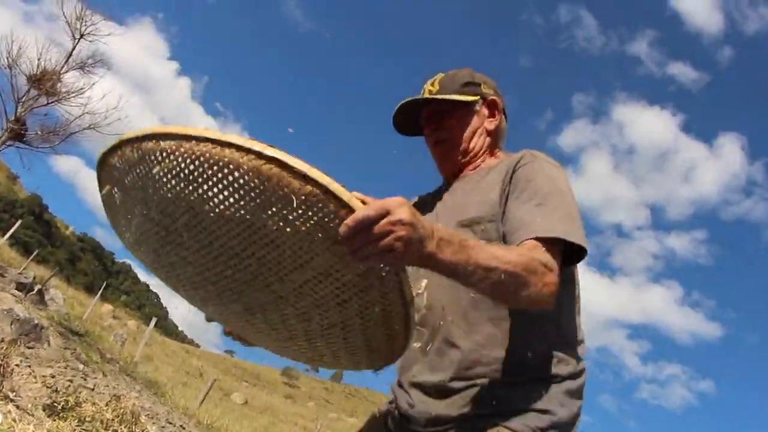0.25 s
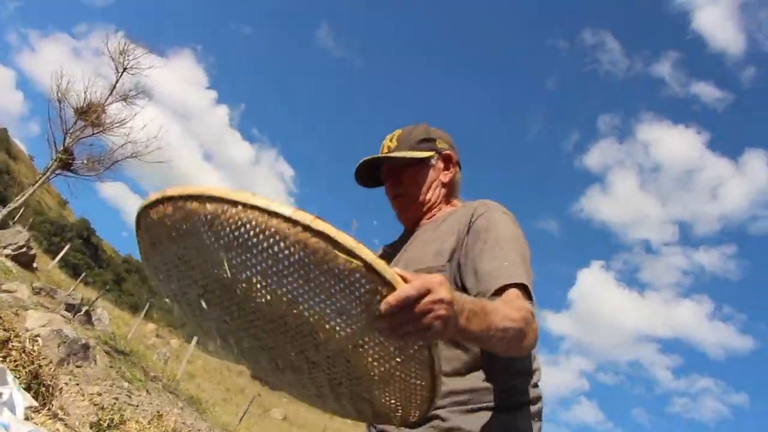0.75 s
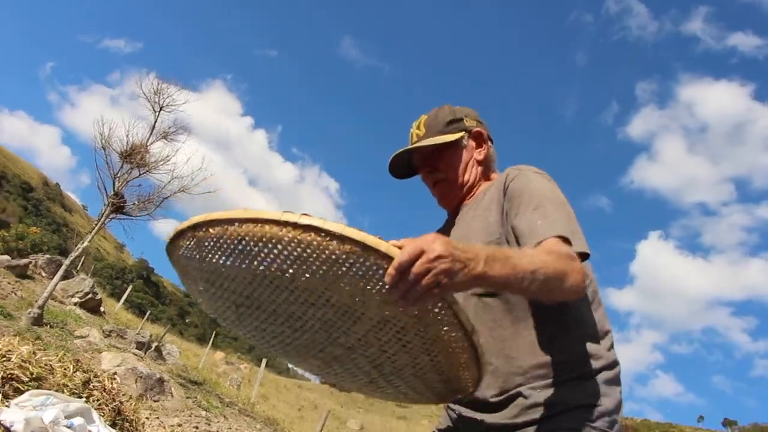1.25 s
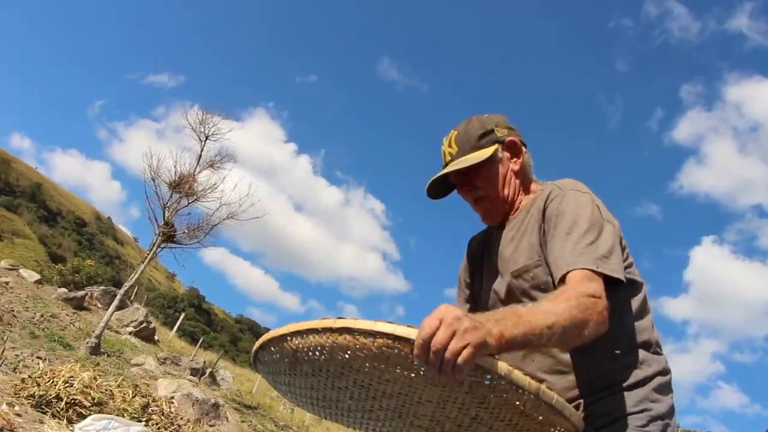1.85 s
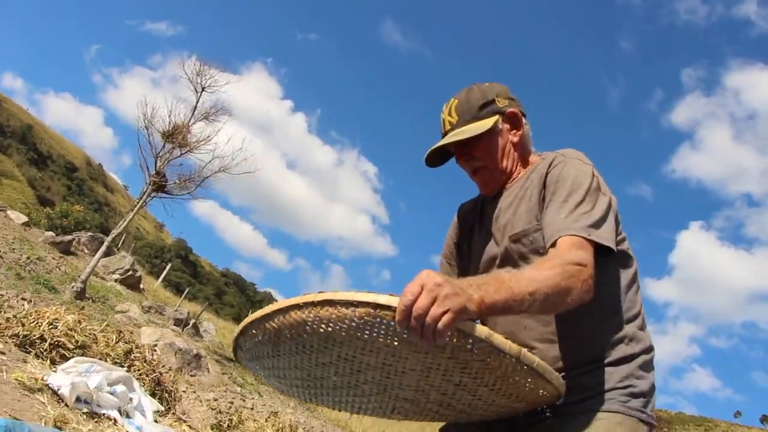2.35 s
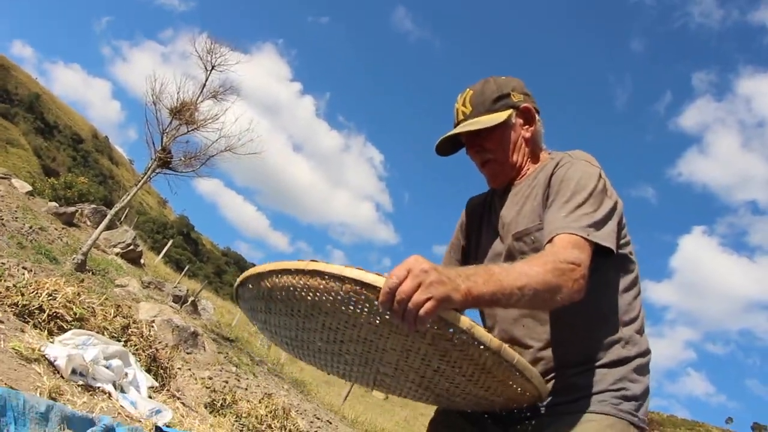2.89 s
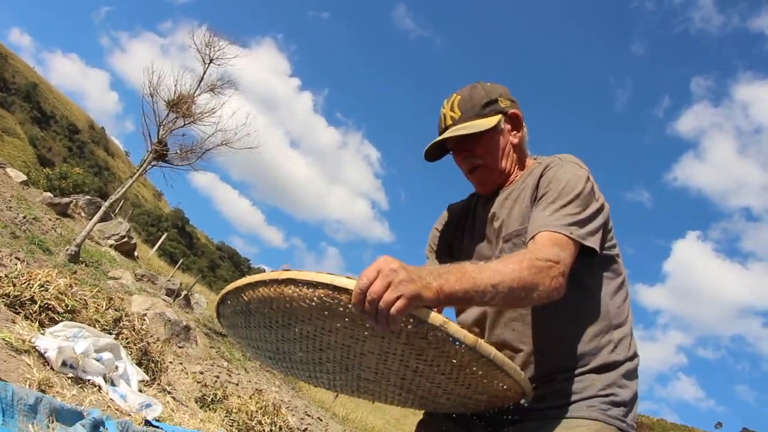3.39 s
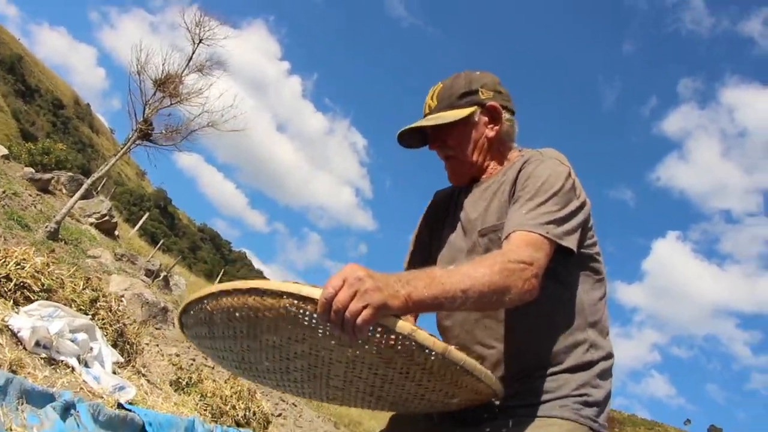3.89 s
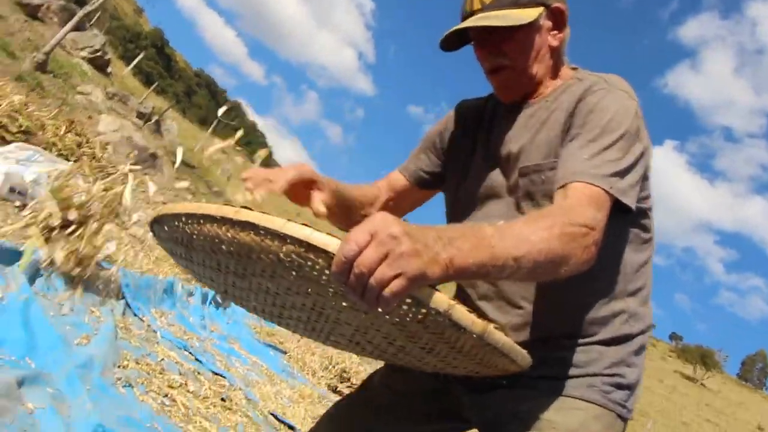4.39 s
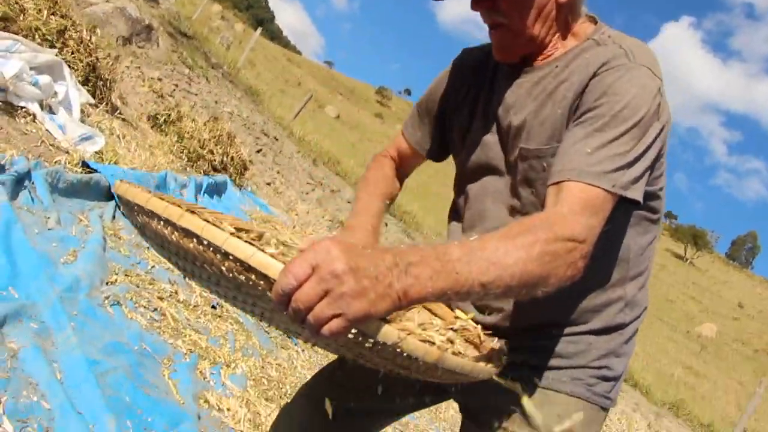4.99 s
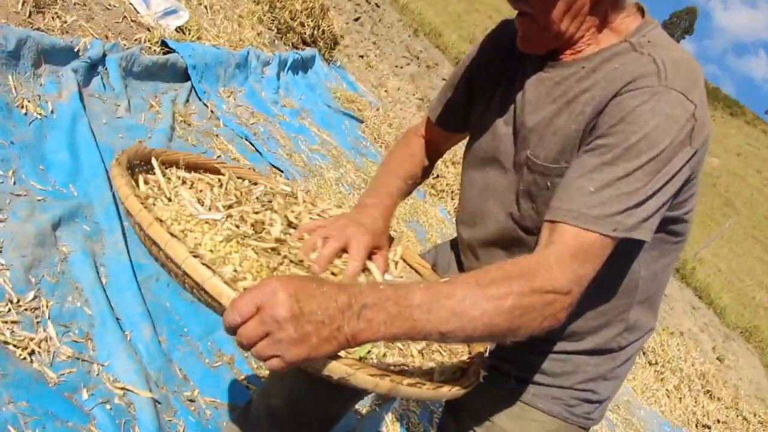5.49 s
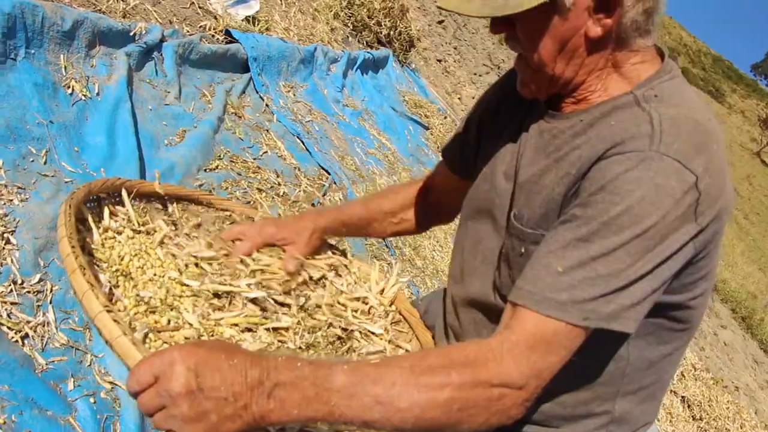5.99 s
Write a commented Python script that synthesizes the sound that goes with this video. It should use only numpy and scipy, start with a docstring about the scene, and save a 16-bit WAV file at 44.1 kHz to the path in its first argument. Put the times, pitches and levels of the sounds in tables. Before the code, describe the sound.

Brisk, hissing shakes of dry husks in a sieve give way to softer hand raking, scattered snaps and two handfuls of pods thrown on a tarpaulin.

```python
"""Outdoors, about a metre from the microphone: dry beans and broken pods are winnowed in a woven cane sieve.
The load is shaken to and fro, levelled, then raked by hand; two handfuls of pods are thrown on a tarpaulin.
Random impacts, filtered by weave or sheet resonances, make the patter of beans, rattle of pods and crackle
of chaff; short damped cycles make single knocks, snaps, bumps, bounces and many small dry cracks.
Filtered noise makes the wind on the two microphone ports and a faint, steady hush."""
import sys
import numpy as np
from scipy import signal
from scipy.fft import rfft, irfft
from scipy.io import wavfile

SR = 44100
rng = np.random.default_rng(int(sys.argv[2]) if len(sys.argv) > 2 else 0)


def generate_wav(sig):
    """Save sig (samples, or channels by samples) to the path in sys.argv[1] as 16-bit PCM at SR."""
    pcm = np.round(np.clip(np.atleast_2d(sig).T, -1, 1) * 32767).astype(np.int16)
    wavfile.write(sys.argv[1], SR, pcm)


N = 275625
TIME = np.arange(N) / SR
STEPS = TIME[::100]  # coarse time grid for slow level curves
FREQ = np.fft.rfftfreq(N, 1 / SR)
TOP_HZ = 16050
PORT_LAG_S = 5e-5  # the sieve is a little to the left
RELEASE_SHAPE = 1.6  # 1 = exponential fall, 2 = bell

# resonances of the loaded weave: f/Hz, width/Hz, level/dB
WEAVE_MODES = [(423, 120, -3), (590, 230, 2.5), (695, 260, -9), (880, 230, -2), (1400, 200, -2),
               (1810, 160, -3), (2340, 270, 2.5), (3540, 250, 11)]


def motion():
    """Stirring of beans, pods, chaff and fines in dB: shakes, rolls and hand strokes add up in power."""
    # all levels are before layer gain
    # shakes to and fro, about six a second: peak t/s, chaff level/dB, beans re chaff/dB
    shake_rows = [(0.05, -23, -17.5), (0.218, -21.5, -21), (0.405, -21, -17), (0.582, -22.5, -20),
                  (0.762, -23.5, -19), (0.917, -21.5, -19.5), (1.075, -23.0, -22), (1.226, -22, -22)]
    shake_rise_s, shake_fall_s = 0.056, 0.082
    shake_pods_db, shake_fines_db = -2, -4.5  # re chaff
    # load rolling back as the sieve is levelled: peak t/s, chaff level/dB, beans re chaff/dB
    roll_rows = [(1.366, -32, -22), (1.505, -36, 4), (1.608, -33.5, -16.5), (1.755, -35.5, -10)]
    roll_rise_s, roll_fall_s = 0.057, 0.045
    roll_pods_db, roll_fines_db = 2, -6.6  # re chaff
    # hand strokes, each with its own mix of the load:
    # peak t/s, chaff level/dB, rise/s, fall/s, beans re chaff/dB, pods re chaff/dB, fines re chaff/dB
    stroke_rows = [(2.197, -31.5, 0.06, 0.13, -28.5, -7.5, -10),
                   (2.392, -31.5, 0.075, 0.018, -23, -1.5, -13),
                   (2.691, -33.5, 0.156, 0.14, -36.5, -7.5, -17), (2.847, -41, 0.046, 0.069, -10, -1, -13),
                   (3.175, -36, 0.107, 0.075, -18.5, -8.5, -7.5),
                   (3.599, -29.5, 0.074, 0.221, -15.5, -3.5, -8), (3.9, -32.5, 0.11, 0.097, -16, -15, -16),
                   (4.419, -38.0, 0.15, 0.12, -14, -9.5, -2), (4.759, -28.5, 0.024, 0.11, -10.5, -8, -6.5),
                   (4.899, -27.5, 0.095, 0.18, -14, -6, -7.5), (5.352, -39, 0.06, 0.013, -3.5, -2.5, -2),
                   (5.499, -27, 0.048, 0.12, -16.5, -8.0, -3.5),
                   (5.851, -33.5, 0.073, 0.12, -9.0, -9, -4.5),
                   (6.088, -26.0, 0.044, 0.15, -22.5, -7.5, -4)]
    # floor of the never quite still load: beans/dB, pods/dB, chaff/dB, fines/dB
    restless_db = (-59, -51, -52, -61)
    clumps_per_s, clump_db = 40, 0.7  # the load moves in clumps, so its level flutters

    power = undb(restless_db) ** 2
    for peak_s, db, beans_db in shake_rows:
        power = power + stir(peak_s, db, shake_rise_s, shake_fall_s, beans_db, shake_pods_db, shake_fines_db)
    for peak_s, db, beans_db in roll_rows:
        power = power + stir(peak_s, db, roll_rise_s, roll_fall_s, beans_db, roll_pods_db, roll_fines_db)
    for row in stroke_rows:
        power = power + stir(*row)
    level_db = curves(np.column_stack([STEPS, 10 * np.log10(power)]))
    return level_db + clump_db * waver(clumps_per_s)


def stir(peak_s, db, rise_s, fall_s, beans_db, pods_db, fines_db):
    """One movement sets beans, pods, chaff and fines going, each in its own proportion of power."""
    shares = undb([beans_db, pods_db, 0, fines_db]) ** 2
    return np.outer(swell(peak_s, db, rise_s, fall_s), shares)


def beans(db):
    """Hard beans patter on the weave and ring its resonances."""
    # colour of the patter: f/Hz, level/dB
    bean_colour = [(80, -53), (170, -11.5), (300, -2.5), (450, 0), (800, 1), (1200, -19.5), (2500, -20),
                   (4000, -49), (7000, -55)]
    body = colour(bean_colour) * (undb(1.0) + modes(WEAVE_MODES))
    patter = contacts(db, per_s=1100, crowding=0.6, uneven_db=5.5, scatter_db=5)
    return unit(patter * body, 250, 750) * undb(db)


def pods(db):
    """Tumbling pods rattle broadly; sliding as a heap over the cane they ring with a hollow note."""
    # pod motion: t/s, share sliding in one heap instead of tumbling (0-1)
    sliding_rows = [(0, 0.05), (2.0, 0), (2.2, 0.89), (2.6, .86), (3.3, 0.4), (3.8, 0.7), (4.7, 0.12),
                    (6.25, 0.26)]
    # colour of the tumbling: f/Hz, level/dB
    tumble_colour = [(300, -39.5), (600, -19.5), (850, -4.5), (1150, -1), (1550, -3.5), (1920, -1),
                     (2250, -3), (2800, -2.5), (4000, -8.5), (8000, -38.5)]
    # colour of the sliding: f/Hz, level/dB
    slide_colour = [(400, -35.5), (900, -13), (1130, 3), (1360, 1.5), (1480, 7), (1700, 2), (2200, -1.5),
                    (3000, -0.5), (4500, -28), (8000, -32)]
    share = np.clip(curves(sliding_rows)[0], 0, 1)

    tumble = contacts(db, per_s=2400, crowding=0.9, uneven_db=1.5, scatter_db=-9.5)
    tumble = tumble * colour(tumble_colour)
    tumble = tumble * (1 + undb(-18.5) * modes(WEAVE_MODES))  # a little of the weave rings along
    slide = contacts(db, per_s=2300, crowding=0.7, uneven_db=2.0, scatter_db=-10.0)
    slide = slide * colour(slide_colour)

    # crossfade at constant power
    mix = np.sqrt(1 - share) * unit(tumble, 1000, 2800)
    mix = mix + np.sqrt(share) * unit(slide, 1000, 2800)
    return mix * undb(db)


def chaff(db, fines_db):
    """Thin flakes crackle; the finest of them hiss at the very top."""
    # colour of the flakes: f/Hz, level/dB
    chaff_colour = [(1200, -52.5), (2400, -9), (3500, -2), (5200, 1.5), (6500, 1.5), (9500, -1),
                    (11500, -12.5), (14000, -33)]
    # colour of the fines: f/Hz, level/dB
    fines_colour = [(7000, -35), (9500, -3.5), (11300, 1.5), (13000, -1.5), (15000, -4), (16000, -22)]
    flakes = contacts(db, per_s=7000, crowding=0.54, uneven_db=4.5, scatter_db=-2.0)
    crackle = unit(flakes * colour(chaff_colour), 4000, 10000) * undb(db)
    fines = contacts(fines_db, per_s=23000, crowding=0.45, uneven_db=8.5, scatter_db=-4.5)
    hiss = unit(fines * colour(fines_colour), 11000, 15500) * undb(fines_db)
    return crackle + undb(-1.5) * hiss


def dry_cracks(chaff_db, count=260, mean_db=-25, follow=0.6, uneven_db=2.0, centre_hz=4400, octaves=0.75):
    """Many small dry cracks, about forty a second at random times, standing out most when the load lies quiet."""
    when, size, pitch = rng.random((count, 3)).T
    index = (when * N).astype(int)
    # cracks follow the chaff by less than dB for dB
    db = mean_db + follow * (chaff_db[index] - chaff_db.mean())
    db = db - uneven_db * np.log(np.maximum(size, 1 / 20))
    hz = np.clip(centre_hz * 2 ** (2 * octaves * (2 * pitch - 1)), 1000, 13000)
    rows = np.transpose([index / SR, db, hz])
    return blows(rows, cycles=0.77, rattle_db=-4, rattle_s=0.0041, rattle_width=0.37, bass_hz=900)


def knocks():
    """Single beans and pods knock, and the sieve knocks once as it is set down at about 1.57 s: heavily damped
    cycles with a faint rattle."""
    # knocks: t/s, level/dB before layer gain, f/Hz
    knock_rows = [(0.5611, -11.5, 1220), (0.5734, -13.5, 1360), (1.4606, -17, 1540), (1.51, -18.5, 1030),
                  (1.5743, -10, 800), (1.8446, -23, 2000), (1.9084, -23, 2200), (1.9752, -23.5, 1450),
                  (2.6, -28, 1330), (3.4182, -18, 980), (3.4341, -10.5, 1610), (3.5488, -17, 1300),
                  (4.6075, -16.5, 830), (4.626, -13.5, 1430), (4.6376, -10, 1080), (4.6946, -15.5, 1270),
                  (4.9425, -20.5, 1360), (5.3067, -16.5, 1090), (5.357, -23, 2400), (5.3714, -21.5, 1510),
                  (5.4657, -18.5, 1400), (5.551, -9, 1960), (5.5812, -23, 1030), (5.7077, -22, 1300),
                  (5.8345, -20.5, 1740), (5.9624, -22, 2890), (6.2184, -35, 1420)]
    return blows(knock_rows, cycles=0.34, rattle_db=-17, rattle_s=0.0061, rattle_width=0.76, bass_hz=343)


def snaps():
    """Dry pods snap: short, high damped cycles without bass."""
    # snaps: t/s, level/dB before layer gain, f/Hz
    snap_rows = [(0.4688, -8, 4200), (0.4851, -23, 4850), (1.8823, -22, 4700), (2.0461, -16.5, 7040),
                 (2.5735, -21, 8240), (2.9925, -22.5, 4940), (4.3138, -12, 4170), (4.368, -18, 8200),
                 (4.7501, -15.5, 5840), (5.3413, -18.5, 9600), (5.3709, -20, 9820), (5.551, -17, 5230),
                 (5.8182, -12, 8400)]
    return blows(snap_rows, cycles=0.55, rattle_db=-10.5, rattle_s=0.0023, rattle_width=0.35, bass_hz=1400)


def bumps():
    """The whole sieve bumps softly: low damped cycles with a strong rattle."""
    # bumps: t/s, level/dB before layer gain, f/Hz
    bump_rows = [(.507, -17.5, 162), (.566, -17, 404), (1.476, -22.5, 130), (1.512, -27.5, 230),
                 (1.574, -28, 382), (2.216, -24.5, 696), (5.787, -19.5, 326), (5.822, -19, 353),
                 (6.214, -20.5, 590)]
    return blows(bump_rows, cycles=0.83, rattle_db=-1.5, rattle_s=0.0097, rattle_width=0.79, bass_hz=108)


def thrown_pods():
    """Handfuls of empty pods land on the tarpaulin, then single pods bounce."""
    # handfuls: t/s, landing gain/dB, shower length/s, left re right/dB
    handful_rows = [(3.422, -19, 0.11, 3), (4.62, -17.5, 0.081, 6)]
    return sum(handful(*row) + place(bounces(row[0]), db=-4, left_db=5) for row in handful_rows)


def handful(start_s, db, length_s, left_db):
    """Pods hit the tarpaulin almost at once and then thin out; the sheet thuds, the husks crackle."""
    # resonances of the struck sheet: f/Hz, width/Hz, level/dB
    tarp_modes = [(435, 76, -6.5), (555, 100, 0.5), (764, 90, -16), (883, 91, 3.5), (1150, 100, -5),
                  (1470, 150, -4), (1790, 200, -7)]
    # colour of the sheet: f/Hz, level/dB
    tarp_colour = [(80, -48), (170, -11), (310, -9), (420, 0.5), (1400, 1.5), (2500, -8.5), (5000, -29)]
    # colour of the husks: f/Hz, level/dB
    husk_colour = [(900, -21.5), (2000, -4.5), (3500, -3.5), (6000, -3), (10000, -4), (12000, -6.5),
                   (16000, -16)]
    age = np.maximum(TIME - start_s, 0)
    shower = (1 - np.exp(-age / 0.012)) * np.exp(-(age / length_s) ** 1.66)
    # impacts grow sparser with age
    thinning_db = np.where(TIME < start_s, 0, 14 * np.exp(-age / length_s))

    sheet = colour(tarp_colour) * (undb(-1) + modes(tarp_modes))
    thuds = contacts(thinning_db, per_s=480, crowding=1.0, uneven_db=2.5, scatter_db=-7.5) * sheet
    husks = contacts(thinning_db, per_s=910, crowding=0.9, uneven_db=1.5, scatter_db=-4.5)
    husks = husks * colour(husk_colour)
    landing = undb(-2.5) * unit(thuds, 0, TOP_HZ) + unit(husks, 0, TOP_HZ)
    return place(shower * landing, db, left_db)


def bounces(start_s, count=12, delay_s=0.07, spread_s=0.24, first_db=-19, fade_db_per_s=30, centre_hz=750):
    """After a handful has landed, single pods bounce on the sheet, ever more softly."""
    when, pitch = rng.random((count, 2)).T
    age = delay_s + spread_s * when
    rows = np.transpose([start_s + age, first_db - fade_db_per_s * age, centre_hz * 2 ** (pitch - 0.5)])
    return blows(rows, cycles=0.67, rattle_db=-9, rattle_s=0.0056, rattle_width=0.46, bass_hz=261)


def wind():
    """Eddies rumble on each port separately; their shared strength swells with gusts and wavers."""
    # gusts and short buffets: peak t/s, level/dB before layer gain, half length/s
    gust_rows = [(.5, -43.5, .3), (1.63, -37.5, 0.23), (1.968, -30, 0.074), (2.29, -38.5, 0.24),
                 (2.785, -43, 0.33), (3.98, -38, 0.047), (4.35, -43, 0.57), (4.61, -32.5, 0.019),
                 (4.772, -28.5, 0.019), (4.925, -32.5, 0.074), (5.15, -36, 0.072), (5.427, -31.5, 0.13),
                 (5.74, -30.5, 0.099), (5.963, -28.5, .035), (6.157, -31, .1)]
    # colour of the eddies: f/Hz, level/dB
    wind_colour = [(10, -34), (22, 6.5), (35, -2.5), (60, -4), (85, -16), (125, -23.5), (200, -34.5),
                   (400, -38), (1000, -40)]
    calm_db = -52  # before layer gain
    buffets_per_s, buffet_db = 9.2, 1.9
    power = undb(calm_db) ** 2 + sum(swell(s, db, half_s, half_s) for s, db, half_s in gust_rows)
    strength = np.sqrt(np.interp(TIME, STEPS, power)) * undb(buffet_db * waver(buffets_per_s))
    eddies = rfft(rng.standard_normal((2, N))) * colour(wind_colour)
    return unit(eddies, 20, 120) * strength


def air():
    """Faint, steady hush of the open air: coloured noise, independent at each port."""
    # colour of the hush: f/Hz, level/dB
    air_colour = [(100, -6.5), (220, 4), (400, -4), (550, 5), (700, 1), (1400, 2), (1720, -20), (1880, 15),
                  (2060, -25), (3300, -35), (3700, 0), (4100, -2), (15000, -32)]
    air_db = -53.5
    hush = rfft(rng.standard_normal((2, N))) * colour(air_colour)
    return unit(hush, 0, TOP_HZ) * undb(air_db)


def contacts(db, per_s, crowding, uneven_db, scatter_db):
    """Stereo spectra of tiny random impacts of uneven size, more frequent when the level is higher."""
    chance = np.clip(per_s * undb(crowding * (db - db.mean())) / SR, 1e-4, 1)  # per sample
    spread = np.clip(rng.standard_normal((3, N)), -np.pi, np.pi)
    sizes = rng.choice([-1, 1], (3, N)) * undb(uneven_db * spread)
    # dividing by sqrt(chance) keeps the mean power independent of the rate
    hits = (rng.random((3, N)) < chance) * sizes / np.sqrt(chance)
    return ports(hits[0], undb(scatter_db) * hits[1:])


def blows(rows, cycles, rattle_db, rattle_s, rattle_width, bass_hz):
    """Each blow is a few damped cycles; what lies around it rattles briefly at about the same pitch."""
    out = np.zeros((3, N + SR))  # direct, two scattered parts
    t = np.arange(SR // 20) / SR
    for s, db, hz in rows:
        ring = np.sin(2 * np.pi * hz * t) * np.exp(-hz * t / cycles)
        edges_hz = [hz / (1 + rattle_width), min(hz * (1 + rattle_width), TOP_HZ)]
        band = signal.butter(1, edges_hz, "band", fs=SR)
        rattle = signal.lfilter(*band, rng.standard_normal((3, len(t))))
        rattle = signal.lfilter(*band, rattle)
        blow = undb(rattle_db) * rattle / rattle.std() * np.exp(-t / rattle_s)
        blow[0] += ring / ring.max()
        start = int(s * SR)
        out[:, start:start + len(t)] += undb(db) * blow
    stereo = irfft(ports(out[0, :N], out[1:, :N] / 2), N)
    # small, open things radiate little bass
    bass_cut = signal.butter(2, bass_hz, "high", fs=SR)
    return signal.lfilter(*bass_cut, stereo)


def swell(peak_s, db, rise_s, fall_s):
    """Power of one push at each time step: it builds up in a bell curve and then dies away."""
    age = STEPS - peak_s
    rise = (age / rise_s) ** 2
    fall = np.abs(age / fall_s) ** RELEASE_SHAPE
    return undb(db) ** 2 * np.exp(-np.where(age < 0, rise, fall))


def waver(per_s):
    """Random values at a given rate, joined by straight lines."""
    return np.interp(TIME * per_s, np.arange(len(STEPS)), rng.standard_normal(len(STEPS)))


def modes(rows):
    """Frequency response of damped modes, given as (f/Hz, width/Hz, level/dB)."""
    response = 0
    for hz, width_hz, db in rows:
        damping = 1j * FREQ * width_hz
        response = response + undb(db) * damping / (hz ** 2 - FREQ ** 2 + damping)
    return response


def colour(points):
    """Causal minimum-phase frequency response through (f/Hz, level/dB) points, via the cepstrum."""
    hz, db = np.transpose(points)
    gain = undb(np.interp(np.log(FREQ + 1), np.log(hz), db))
    cepstrum = irfft(np.log(gain), N)
    cepstrum[1:] *= 2 * (np.arange(1, N) < N / 2)  # fold onto positive time
    return np.exp(rfft(cepstrum))


def ports(direct, scatter, spread_hz=4500, likeness=0.82):
    """Direct sound reaches the right port later; scattered sound grows less alike with frequency."""
    alike = min(likeness, 1) * np.sinc(FREQ / spread_hz)
    mid, side = rfft(scatter) * np.sqrt([(1 + alike) / 2, (1 - alike) / 2])
    front = rfft(direct)
    lag = np.exp(-2j * np.pi * FREQ * PORT_LAG_S)
    return np.array([front + mid + side, front * lag + mid - side])


def unit(spectra, lo_hz, hi_hz):
    """Stereo sound from its spectra, scaled to rms 1 between lo_hz and hi_hz."""
    band = irfft(spectra * (FREQ > lo_hz) * (FREQ < hi_hz), N)
    return irfft(spectra, N) / np.std(band)


def place(x, db, left_db):
    """Layer gain and left-minus-right balance."""
    return x * undb(db + np.array([[left_db], [-left_db]]) / 2)


def curves(rows):
    """The value columns of (t/s, value, ..) rows, joined by straight lines."""
    s, *columns = np.transpose(rows)
    return [np.interp(TIME, s, column) for column in columns]


def undb(db):
    """Decibels to gain."""
    return 10 ** (np.asarray(db) / 20)


def scene():
    """The moving load, its cracks, knocks and snaps, the thrown handfuls, the wind and the open air."""
    bean_db, pod_db, chaff_db, fines_db = motion()
    load = place(beans(bean_db), db=-1.5, left_db=-1.0)
    load = load + place(pods(pod_db), db=-0.6, left_db=0.5)
    load = load + place(chaff(chaff_db, fines_db), db=0.3, left_db=0.25)
    load = load + place(dry_cracks(chaff_db), db=-6.5, left_db=-2.5)
    hits = place(knocks(), db=4.5, left_db=3.0)
    hits = hits + place(snaps(), db=5.0, left_db=3.5)
    hits = hits + place(bumps(), db=-12.5, left_db=5.0)
    return load + hits + thrown_pods() + place(wind(), db=1.5, left_db=0.0) + air()


def record(dry):
    """The recorder cuts the top steeply: a 12th-order elliptic low-pass."""
    top_cut = signal.ellip(12, 0.2, 80, TOP_HZ, fs=SR, output="sos")
    return signal.sosfilt(top_cut, dry)


dry = scene()
out = record(dry)
generate_wav(out)
```